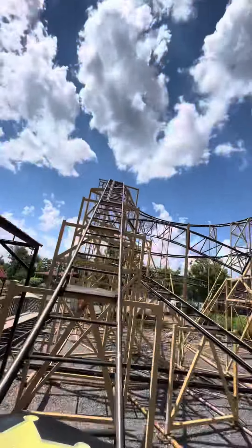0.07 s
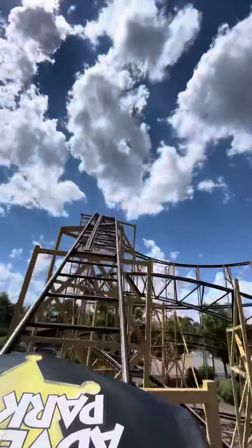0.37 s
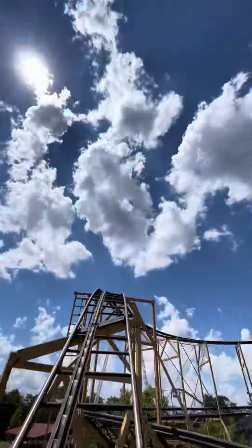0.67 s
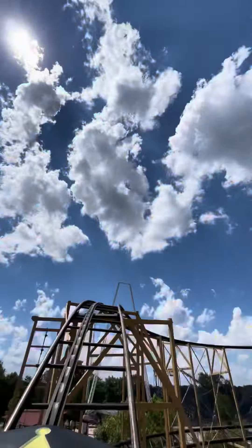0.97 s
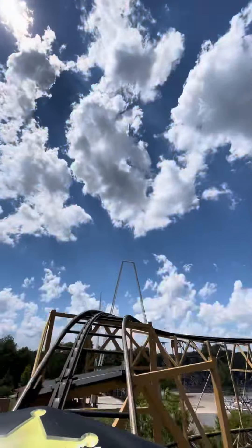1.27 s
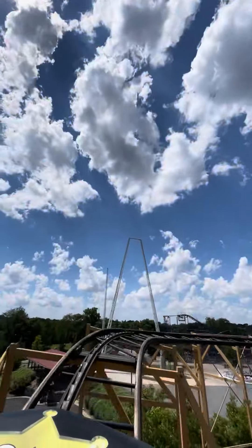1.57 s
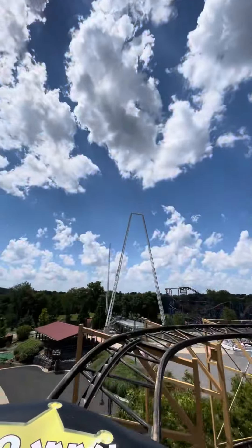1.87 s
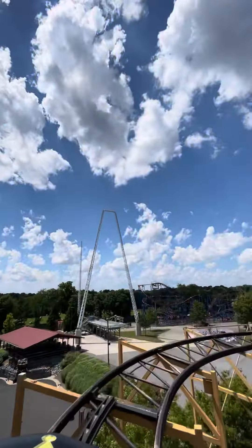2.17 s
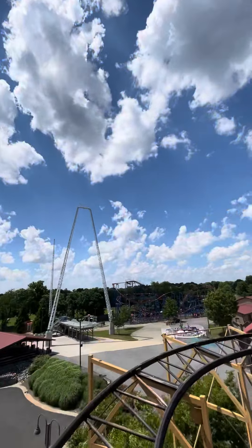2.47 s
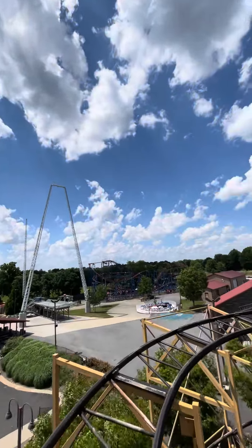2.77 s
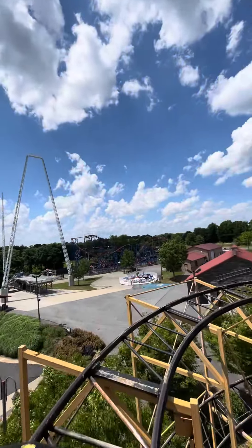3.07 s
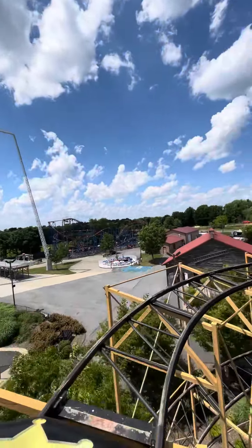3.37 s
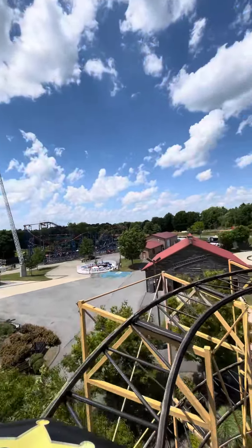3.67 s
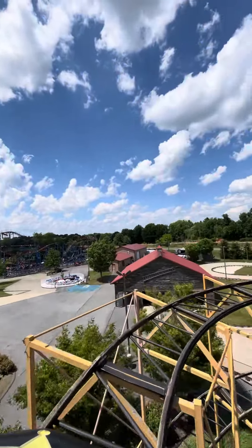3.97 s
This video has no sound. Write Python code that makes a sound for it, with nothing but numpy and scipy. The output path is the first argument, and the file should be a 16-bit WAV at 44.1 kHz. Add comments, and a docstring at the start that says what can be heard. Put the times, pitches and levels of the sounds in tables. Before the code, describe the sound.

A roller coaster car rumbles up a steel track, heard from the open seat. The wheels grind briefly, then loose fittings clank close by in rushing wind. As the car slows at the top, a fast, dry ticking starts.

```python
"""Roller coaster, from the seat

A steel coaster car runs up a hill and slows over the curved crest, the microphone riding in the open air.
The wheels rumble through the car body and roar in the tubular rails, duller as the speed falls.
They scrub at the foot of the climb; loose steel fittings clank close by and wind rushes past.
At the top a fast, even ticking comes out of the running gear and a breeze crosses the microphone."""
import sys
import numpy as np
from scipy import signal
from scipy.fft import rfft, irfft, next_fast_len
from scipy.io import wavfile
from scipy.ndimage import uniform_filter1d, map_coordinates

SR = 44100
rng = np.random.default_rng(int(sys.argv[2]) if len(sys.argv) > 2 else 0)


def int16_out(signal):
    """Quantize to a 16-bit WAV file."""
    q = np.round(np.clip(np.atleast_2d(signal).T, -1, 1) * 32767)
    wavfile.write(sys.argv[1], SR, q.astype(np.int16))


N = 176400

# rumble at the seat: t/s, relative level/dB
RUMBLE_LEVEL = [(0, -13), (.45, -11), (.68, -13.5), (.78, -9.5), (1.06, -16), (1.3, -16.5), (1.6, -18),
                (2.2, -17), (2.35, -20.5), (3.2, -19), (3.4, -26), (3.55, -21), (4, -18.5)]
# spectrum of the car body: f/Hz, level/dB
BODY_SPECTRUM = [(20, -28.5), (38, -14.5), (54, -12.5), (68, 0), (84, -10), (103, -1.5), (135, -1.5),
                 (160, -5), (215, -13.5), (245, -18.5), (350, -23.5), (600, -36), (1500, -77.5)]
# its resonances: f/Hz, width/Hz, lift/dB
BODY_MODES = [(106.2, 29, 1.45), (157, 11, 0.81), (189, 43, 3.7), (211.5, 20.6, 4.56)]
def rumble(level_db=-0.28, shake_db=0.7):
    """The uneven track shakes the car body all around the microphone."""
    gain = amp(curve(RUMBLE_LEVEL) + level_db + shake_db * wobble(22.08))
    return gain * vibration(BODY_SPECTRUM, BODY_MODES)


# roar from the rails below: t/s, relative level/dB
ROAR_LEVEL = [(0, -19.5), (.38, -17), (.5, -21), (1.09, -23), (1.37, -28), (1.67, -25.5), (1.78, -33.5),
              (1.88, -28.5), (2.15, -26.5), (2.37, -34), (2.55, -29), (3.45, -34), (4, -43.5)]
# its treble against its bass: t/s, level/dB
ROAR_TREBLE = [(0, 1), (.6, 3), (1.1, 8.5), (2.1, -0.5), (3.2, -15.5), (4, -13)]
# spectrum of the rails under rolling wheels: f/Hz, level/dB
RAIL_SPECTRUM = [(180, -89), (270, 0), (430, -4), (600, -8), (800, -6.5), (1050, -14), (1400, -21.5),
                 (3500, -88)]
# resonances of the steel tubes: f/Hz, width/Hz, lift/dB
RAIL_MODES = [(440, 59, 6.5), (521, 67, 4.5), (660, 34, 5.5), (813, 14, 5), (996, 30, 6)]
def wheel_roar(level_db=-3, rough_db=2, split_hz=660):
    """Rolling wheels ring the rails under the seat; the upper resonances fade as the car slows."""
    roar = vibration(RAIL_SPECTRUM, RAIL_MODES, patchy_db=3)
    bass = filtered(roar, lambda hz: 1 / (1 + (hz / split_hz) ** 4))
    treble = amp(curve(ROAR_TREBLE)) * (roar - bass)
    return amp(curve(ROAR_LEVEL) + level_db + rough_db * wobble(70)) * (bass + treble)


# growl of the wheels under load: t/s, level/dB
DRONE_LEVEL = [(0, -16), (.3, -13), (.68, -24), (.78, -20.5), (.95, -31), (2.2, -32.5), (4, -33.5)]
# its spectrum: f/Hz, level/dB
DRONE_SPECTRUM = [(135, -39), (172, -3), (208, 1.5), (245, -13), (290, -17.5), (335, -10), (450, -19),
                  (900, -73)]
def wheel_drone():
    """The loaded wheels growl through the floor, far less once the car goes light near the top."""
    return amp(curve(DRONE_LEVEL)) * vibration(DRONE_SPECTRUM, BODY_MODES)


# bumps along the track: t/s, body level/dB, rail level/dB
JOLTS = [(0.744, -18.5, -20.5), (.915, -19, -23.5), (1.481, -22, -30), (1.609, -21, -39), (1.87, -21, -43),
         (2.028, -17.5, -34), (2.64, -15.5, -30), (2.96, -14, -46), (3.622, -19, -38.5), (3.877, -20, -62)]
# spectrum of a struck rail: f/Hz, level/dB
STRUCK_RAIL = [(280, -28), (460, -2.5), (700, 0), (1050, -16), (1500, -22.5), (7500, -100)]
def jolts(attack_s=0.0053, hold_s=0.022, t60_s=0.12):
    """A harder bump now and then thuds in the car body and rings the rail below."""
    thud = bursts([(s, hold_s, db) for s, db, _ in JOLTS], attack_s, t60_s)
    rail = bursts([(s, hold_s, db) for s, _, db in JOLTS], attack_s, t60_s)
    body = thud * vibration(BODY_SPECTRUM, BODY_MODES)
    return body + rail * vibration(STRUCK_RAIL, RAIL_MODES, patchy_db=3)


# bites of the wheels on the rail: t/s, hold/s, level/dB
SCRUBS = [(.26, 0.051, -18), (.37, 0.032, -22)]
# spectra of the grind and of its hiss: f/Hz, level/dB
GRIND_SPECTRUM = [(200, -22), (330, 6.5), (1000, 7), (1300, 2), (2000, 3.5), (4000, -6.5), (6000, -13.5),
                  (10000, -43), (15000, -61)]
HISS_SPECTRUM = [(3000, -14), (5500, 12), (8500, -7), (12500, -17.5), (14000, -43.5)]
# resonances of the car's steel fittings: f/Hz, width/Hz, lift/dB
STEEL_MODES = [(1850, 80, 5), (2195, 45, 6), (2500, 80, 4), (2660, 40, 3), (3180, 60, 4), (4990, 70, 4),
               (5430, 45, 7), (5900, 90, 4)]
def wheel_scrub(attack_s=0.011, hiss_db=-15):
    """At the foot of the climb the wheels grind on the rail; each bite's hiss dies before its ring."""
    modes = RAIL_MODES + STEEL_MODES[:5]
    grind = bursts(SCRUBS, attack_s, t60_s=0.5) * vibration(GRIND_SPECTRUM, modes, patchy_db=3)
    hiss = bursts(SCRUBS, attack_s, t60_s=0.104) * vibration(HISS_SPECTRUM)
    return grind + amp(hiss_db) * hiss


# clanks near the seat: t/s, relative level/dB, knock offset/dB
CLANKS = [(0.602, -33, -7), (0.751, -35.5, 10), (0.897, -31.5, 3), (0.917, -23.5, -2), (0.996, -22.5, -1.5),
          (1.016, -23, 2), (1.068, -17, -3), (1.145, -29, -14), (1.164, -22, -2), (1.239, -27.5, -7),
          (1.268, -24, -3.5), (1.372, -26.5, -3.5), (1.4044, -30, 1), (1.498, -23, -5), (1.528, -25, 2),
          (1.6087, -31, -1), (1.6402, -23.5, -3), (1.738, -35.5, -19), (1.9015, -28, -5.5),
          (1.9525, -28, -3), (2.058, -27.5, -6), (2.105, -30.5, -0.5), (2.219, -29, -1.5),
          (2.439, -28.5, -2), (2.625, -32.5, -6), (2.7377, -39, 1.5), (2.995, -31.5, -6.5),
          (3.1717, -30, -2.5), (3.334, -28.5, -9.5), (3.384, -30, -2.5), (3.451, -33.5, -4),
          (3.6247, -33.5, -2.5), (3.769, -38, -4)]
# spectra of the fittings' bright ring and lower knock: f/Hz, level/dB
RING_SPECTRUM = [(2000, -14), (4300, -4.5), (5100, 4), (6000, 3.5), (6700, -0.5), (7500, -5.5),
                 (8500, -15.5), (12000, -33), (14000, -48)]
KNOCK_SPECTRUM = [(200, -37), (500, 13), (900, 12.5), (1400, 11.5), (2200, 10.5), (3200, 6), (4500, -4.5),
                  (8000, -57.5)]
def clanks(attack_s=.005, hold_s=.005, ring_db=-7, knock_db=-4, rail_db=-7, chatter_db=-0.5):
    """Loose fittings strike close by: a bright steel ring, a lower knock, and the rail ringing on."""
    ring_hits = [(s - attack_s / 2, hold_s, db + ring_db) for s, db, _ in CLANKS]
    knock_hits = [(s, hold_s, db + offset + knock_db) for s, db, offset in CLANKS]
    rail_hits = [(s, hold_s, db + rail_db) for s, db, _ in CLANKS]
    chatter = unit(amp(chatter_db * wobble(220)))  # each clank is a short chatter of contacts
    ring = bursts(ring_hits, attack_s, t60_s=.13) * vibration(RING_SPECTRUM, STEEL_MODES, patchy_db=3)
    knock = bursts(knock_hits, attack_s, t60_s=.15) * vibration(KNOCK_SPECTRUM, STEEL_MODES, patchy_db=3)
    rail = bursts(rail_hits, attack_s=.012, t60_s=.48) * vibration(STRUCK_RAIL, RAIL_MODES, patchy_db=3)
    return chatter * (ring + knock + rail)


# air rushing past the seat: t/s, level/dB
WIND_LEVEL = [(0, -34.5), (.22, -29.5), (.5, -36), (.68, -38.5), (.77, -31), (.88, -35.5), (1.15, -32),
              (1.45, -42.5), (1.8, -44.5), (2.1, -41), (2.35, -45), (3.2, -41.5), (4, -44)]
# its spectrum: f/Hz, level/dB
WIND_SPECTRUM = [(400, -15), (1100, 8), (1800, 6.5), (2800, 2.5), (4000, -2.5), (4900, -8), (7200, -8.5),
                 (8500, -24), (12000, -30), (13500, -66.5)]
def wind(flutter_db=-1.8):
    """Wind flutters over the open car, right at the microphone."""
    return amp(curve(WIND_LEVEL) + flutter_db * wobble(220)) * vibration(WIND_SPECTRUM, patchy_db=3.5)


# ticking on the crest: t/s, relative level/dB
TICK_LEVEL = [(2.28, -42.5), (2.9, -42), (3.3, -38), (4, -41.5)]
# spectrum of a tick's click: f/Hz, level/dB
TICK_SPECTRUM = [(600, -23), (1300, 1.5), (1900, -3), (2900, 5), (6000, -17), (8000, -16.5), (13000, -38)]
def ticking(count=42, start_s=2.2846, gap_s=.0411, gap_growth_s=.0000286,
            scatter_db=2, ring_hz=1720, pitch_spread=.11, ring_db=-0.5):
    """The running gear under the car ticks dryly, slowing a little; each tick rings at its own pitch."""
    k = np.arange(count)
    times = start_s + gap_s * k + gap_growth_s * k ** 2 / 2
    size, pitch = rng.standard_normal((count, 2)).T
    beats = bursts([(s, .002, db) for s, db in zip(times, scatter_db * size)], attack_s=.002, t60_s=.028)
    latest_tick = np.searchsorted(times, np.arange(N) / SR) - 1
    hz = ring_hz * np.exp(pitch_spread * pitch[latest_tick])
    ring = amp(ring_db) * np.sin(2 * np.pi * np.cumsum(hz) / SR)
    click = vibration(TICK_SPECTRUM, patchy_db=3)
    return amp(curve(TICK_LEVEL)) * beats * (click + ring)


# jangle around the seat: t/s, relative level/dB
JANGLE_LEVEL = [(.8, -53), (.9, -44), (1.25, -41), (1.45, -51), (4, -55)]
# single clinks of small parts: t/s, level/dB
CLINKS = [(2.778, -42), (2.821, -46), (2.866, -44), (2.928, -46), (3.866, -51), (3.95, -42)]
def rattle(hits_per_s=70, range_db=10, attack_s=.002, t60_s=.05):
    """Small loose parts nearby jangle at random, most on the steep part; a few clinks stand out."""
    draws = rng.random((int(hits_per_s * N / SR), 2))
    hits = [(when * N / SR, 0, range_db * (size - .5)) for when, size in draws]
    jangle = amp(curve(JANGLE_LEVEL)) * bursts(hits, attack_s, t60_s)
    clinks = bursts([(s, 0, db) for s, db in CLINKS], attack_s, t60_s)
    return np.hypot(jangle, clinks) * vibration(RING_SPECTRUM, STEEL_MODES, patchy_db=3)


# breeze at the top of the hill: t/s, level/dB
BREEZE_LEVEL = [(2, -71), (2.8, -59.5), (3.5, -40.5)]
# its spectrum: f/Hz, level/dB
BREEZE_SPECTRUM = [(150, -34.5), (400, -2.5), (800, 5.5), (1300, -36.5)]
def crosswind():
    """Over the crest a breeze crosses the microphone and pushes its two ports in opposite senses."""
    breeze = unit(filtered(rng.standard_normal(N), lambda hz: amp(along(BREEZE_SPECTRUM, hz))))
    return amp(curve(BREEZE_LEVEL)) * np.array([breeze, -breeze])


# stereo width at the seat, on the fast climb and on the calmer crest: f/Hz, side over mid/dB
WIDTH_CLIMB = [(600, -67), (1450, 10), (2200, 9.5), (4200, -0.5), (8300, 10.5), (11000, -7.5)]
WIDTH_CREST = [(450, -58.5), (1000, -1), (1800, -11.5), (3000, 16.5), (4000, -4), (5100, -7), (8000, 8),
               (11000, -29)]
# blend from the climb's width toward the crest's: t/s, crest share/0-1
CREST_SHARE = [(.8, 0.017), (1.9, 0.28), (2.35, 0.62)]
def vibration(spectrum, modes=(), patchy_db=0):
    """Stereo noise of rms 1: a broad spectrum, resonances and, if patchy, partials that come and go."""
    noise = rng.standard_normal((2, N))
    if patchy_db:
        frames = signal.stft(noise, nperseg=1024)[2]
        patches = uniform_filter1d(rng.standard_normal(frames.shape[1:]), size=3, axis=0)
        patches = uniform_filter1d(patches, size=6, axis=1)
        noise = signal.istft(frames * amp(patchy_db * unit(patches)), nperseg=1024)[1][:, :N]
    hz = np.fft.rfftfreq(N, 1 / SR)
    resonance_db = sum(lift / (1 + (2 * (hz - f) / width) ** 2) for f, width, lift in modes)
    coloured = rfft(noise) * amp(along(spectrum, hz) + resonance_db)

    def mid_side(width):
        angle = np.arctan(amp(along(width, hz)))
        return irfft(coloured * np.array([np.cos(angle), np.sin(angle)]), N)
    crest = curve(CREST_SHARE)
    mid, side = (1 - crest) * mid_side(WIDTH_CLIMB) + crest * mid_side(WIDTH_CREST)
    return unit(np.array([mid + side, mid - side]))


def bursts(rows, attack_s, t60_s):
    """Attack, hold and decay envelopes, summed in power, for rows of t/s, hold/s, level/dB."""
    power = np.zeros(N + 2 * SR)
    t = np.arange(SR // 10 + int(t60_s * SR)) / SR
    rise = np.minimum(t / attack_s, 1)
    for s, hold_s, db in rows:
        decay = np.exp(-np.log(1000) * np.maximum(t - attack_s - hold_s, 0) / t60_s)
        power[max(round(s * SR), 0):][:len(t)] += (amp(db) * rise * decay) ** 2
    return np.sqrt(power[:N])


def amp(db):
    """Decibels to gain."""
    return 10 ** (np.asarray(db) / 20)


def unit(x):
    """Scaled to rms 1."""
    return x / np.sqrt(np.mean(x ** 2) + 1e-20)


def along(points, hz):
    """Rows of f/Hz, value, interpolated on a log frequency axis."""
    f, value = np.transpose(points)
    return np.interp(np.log(hz + 1), np.log(f + 1), value)


def curve(rows):
    """Rows of t/s, value, interpolated to every sample."""
    return np.interp(np.arange(N) / SR, *np.transpose(rows))


def wobble(rate):
    """A smooth random curve, rate knots a second."""
    return map_coordinates(rng.standard_normal(8192), [np.arange(N) * rate / SR], mode="wrap")


def filtered(x, response):
    """x shaped by a gain that depends on frequency."""
    size = next_fast_len(N + SR // 2)
    return irfft(rfft(x, size) * response(np.fft.rfftfreq(size, 1 / SR)), size)[..., :N]


def scene():
    """Everything rides with the microphone, in the open air."""
    running = rumble() + wheel_drone() + jolts() + wheel_roar() + wheel_scrub()
    return running + clanks() + wind() + ticking() + rattle() + crosswind()


def record(dry):
    """The recorder at the seat rounds the highest peaks and keeps nothing above its band limit."""
    ceiling, top_hz = .95, 15800
    rounded = dry / (1 + np.abs(dry / ceiling) ** 8) ** (1 / 8)
    return filtered(rounded, lambda hz: hz < top_hz)


dry = scene()
out = record(dry)
int16_out(out)
```